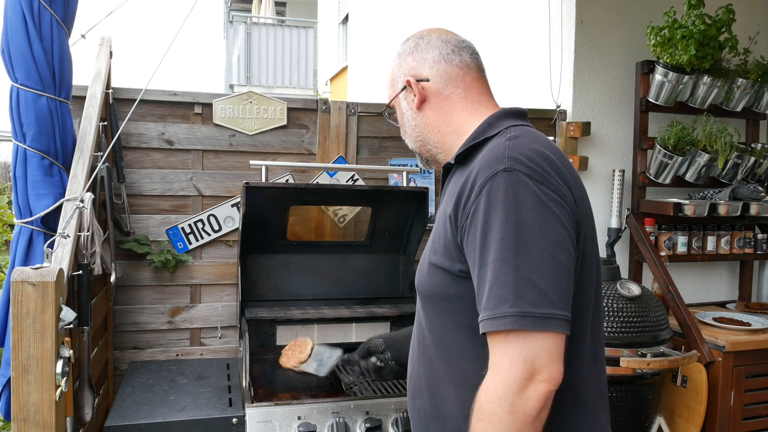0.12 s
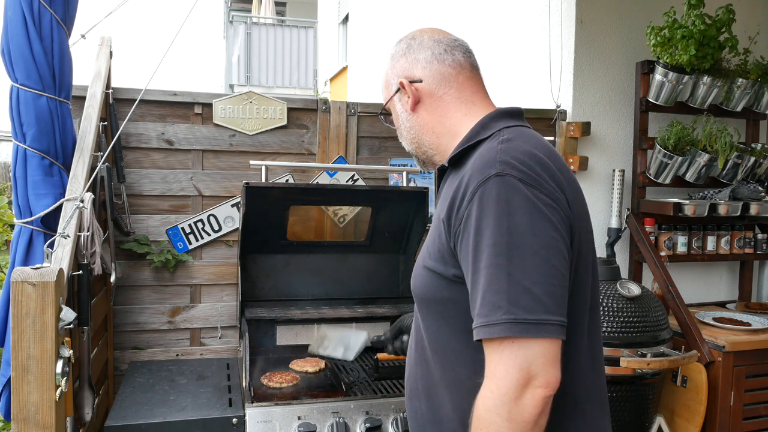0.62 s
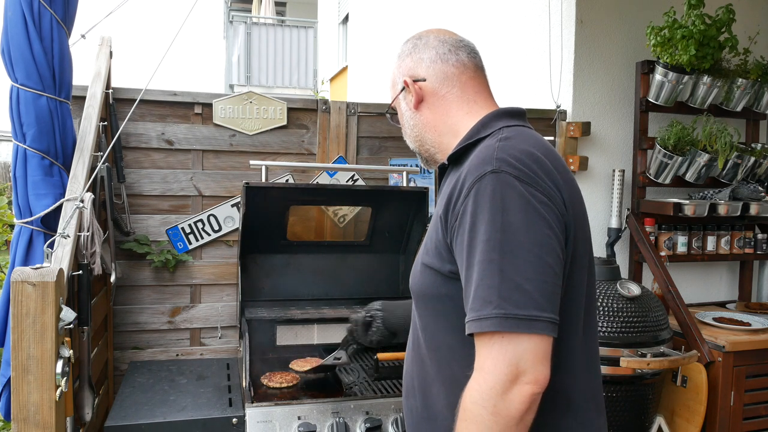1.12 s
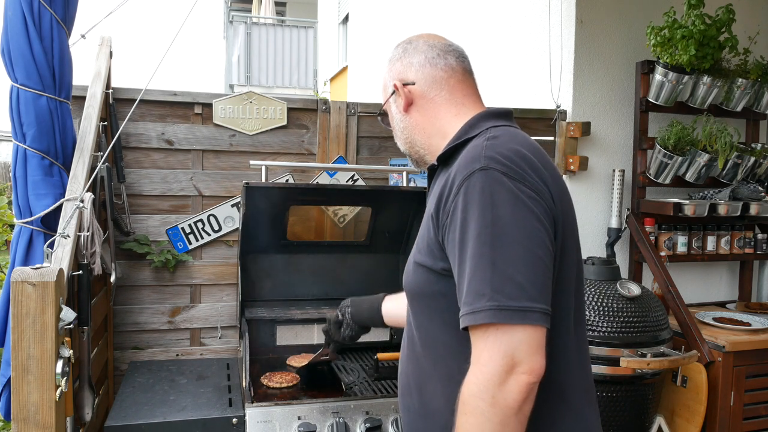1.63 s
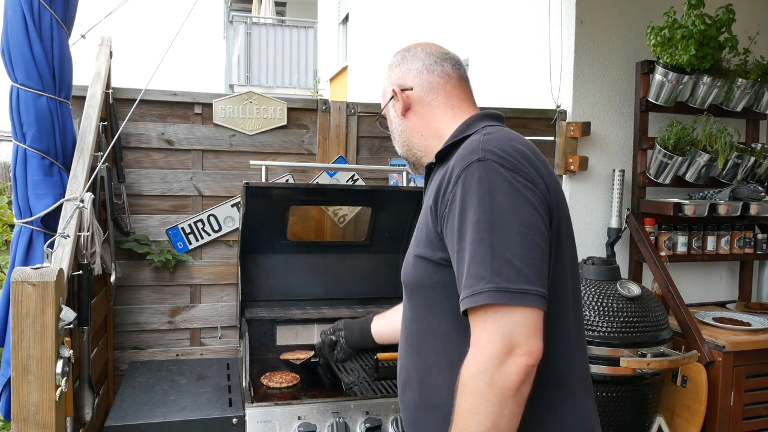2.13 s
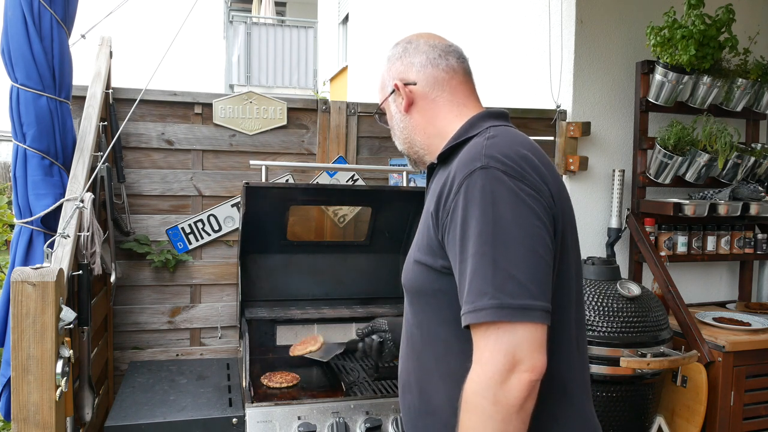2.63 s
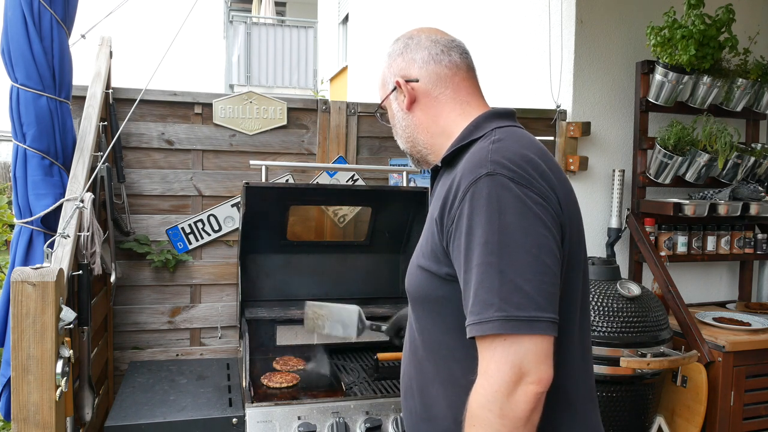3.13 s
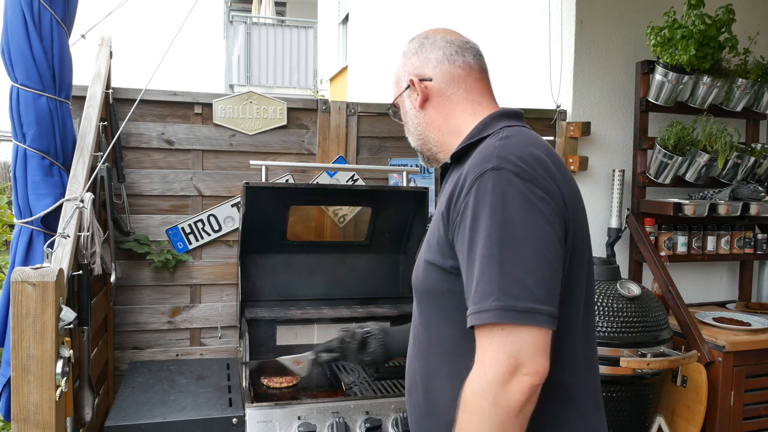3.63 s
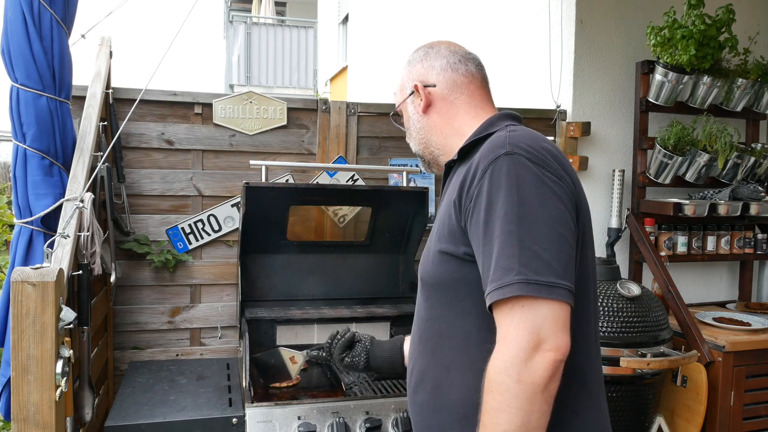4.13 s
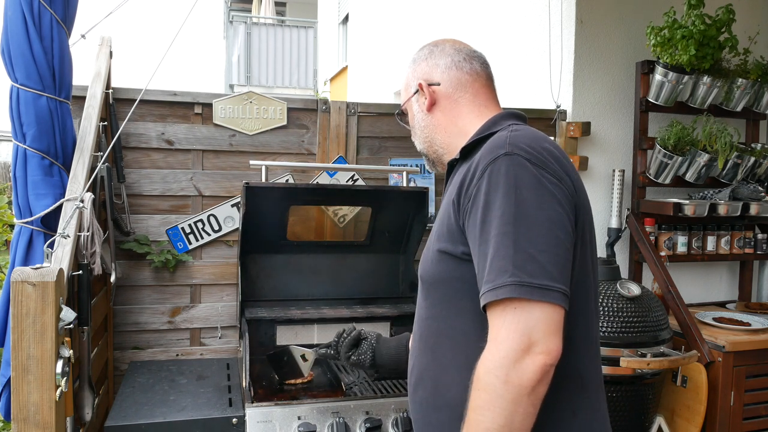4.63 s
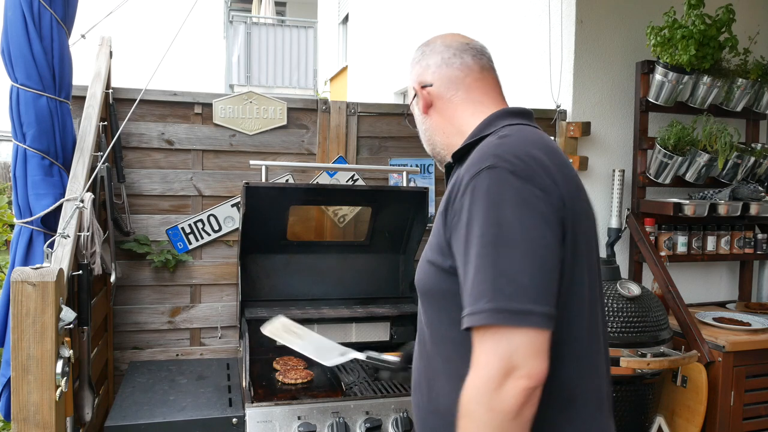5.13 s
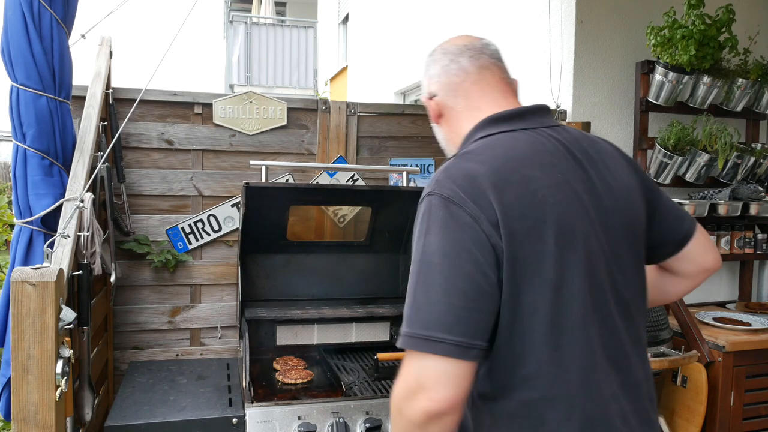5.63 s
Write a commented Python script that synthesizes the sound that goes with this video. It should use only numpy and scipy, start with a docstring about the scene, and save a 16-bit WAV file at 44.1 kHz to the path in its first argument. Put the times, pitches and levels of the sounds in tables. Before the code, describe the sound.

A soft sizzle opens, then flares sharply as a burger patty lands on hot steel. Frying continues bright and crackly with popping fat. A spatula knocks and scrapes the plate just after one second, squeaking faintly; a second patty hisses near three seconds, and harder clanks and scrapes follow around four. Outdoors, near-mono microphone, with low wind buffeting and a faint distant wash.

```python
"""A soft sizzle over low wind comes first, then surges as a burger patty lands on a steel griddle outdoors.
Frying is random bubble clicks mixed with hiss, coloured and echoed by the grill hood; spits of fat are short pops.
Sliding steel squeals as noise through narrow resonances. A spatula knocks and scrapes, ringing plate and blade.
Gusts rumble on the microphone as low filtered noise, above a steady wash from far traffic and burners."""
import sys
import numpy as np
from scipy import signal
from scipy.io import wavfile
from scipy.ndimage import uniform_filter1d

SR = 44100
rng = np.random.default_rng(int(sys.argv[2]) if len(sys.argv) > 2 else 0)


def master_out(mix):
    """Clip the mix to full scale and print it as 16-bit PCM to the path in sys.argv[1]."""
    frames = np.transpose(np.atleast_2d(mix))
    ceiling = np.clip(frames, -1, 1)
    pcm = np.round(ceiling * 32767).astype(np.int16)
    wavfile.write(sys.argv[1], SR, pcm)


def amplitude_ratio(level_db):
    """Convert a level in decibels to the matching linear amplitude (field) ratio."""
    exponent = np.asarray(level_db, float) / 20
    return 10 ** exponent


N = 253575  # length of the scene in samples

# ringing tones of the griddle plate: (pitch_hz, relative_db, relative time to fall 60 dB)
PLATE_MODES = [(284.7, 4, 0.31), (303, -3.5, 0.5), (358, 0, 0.21), (408, -6, 0.13), (521, 3, 1),
               (555, -1, 0.47), (661, 8.5, 0.37), (799, 17, 0.2), (782, -5.5, 0.38), (830, -8, .22),
               (870, -34, 0.22), (969, 1, 0.19)]
# ringing tones of the spatula blade: (pitch_hz, relative_db, relative time to fall 60 dB)
BLADE_MODES = [(1040.5, -11, 0.44), (1172, -5, 0.2), (1192, -1, 0.5), (1235, -7, 0.37), (1657, -11, 0.41),
               (1960, -9.5, 0.29), (1930, -17, 0.21), (2247, -4, 0.086), (2340, -7.5, 0.15),
               (2490, -6, 0.057), (2780, -4, 0.084), (2900, -4.5, 0.077), (3250, -11, 0.072),
               (3280, 1, 0.074), (3720, -1.5, 0.044), (4250, -11, 0.069), (4470, -2.5, 0.16),
               (4900, -4.5, 0.1), (5900, -4, 0.092), (7660, -3.5, 0.062)]


def evened(x):
    """Scales to rms 1."""
    return x / np.sqrt(np.mean(x ** 2) + 1e-20)


def read(points, hz):
    """Reads a spectrum on a log-frequency axis."""
    f, value = np.transpose(points)
    return np.interp(np.log(hz + 1), np.log(f + 1), value)


def add(mix, s, sound):
    """Mixes a sound in at s seconds."""
    part = mix[round(s * SR):][:len(sound)]
    part += sound[:len(part)]


def shaped(x, field_db, size=512):
    """Multiplies the short-time spectrum by a dB field of (Hz, s)."""
    overlap = size * 3 // 4
    hz, t, z = signal.stft(x, SR, nperseg=size, noverlap=overlap)
    z = z * amplitude_ratio(field_db(hz[:, None], t))
    return signal.istft(z, SR, nperseg=size, noverlap=overlap)[1][:N]


def causal(db):
    """Minimum-phase impulse response of a half spectrum in dB."""
    log_gain = np.log(amplitude_ratio(np.concatenate([db, db[-2:0:-1]])))
    return np.fft.ifft(np.exp(np.conj(signal.hilbert(log_gain)))).real[:len(db)]


def clicks(count, per_s, spread_db):
    """Random clicks of either sign, most small and a few large."""
    chance, size, sign = rng.random((3, count))
    heights = amplitude_ratio(spread_db * np.minimum(-np.log(size + 1e-9), 5))
    return (chance < per_s / SR) * heights * np.sign(sign - .5)


def patches(bins, frames, count, rows=257):
    """A random field over (Hz, frame), smooth across bins and frames, rms 1."""
    field = rng.standard_normal((count, rows)).T
    across_hz = uniform_filter1d(field, round(bins), 0)
    return evened(uniform_filter1d(across_hz, round(frames), 1))


def heat(t):
    """Level dB and brightness dB per octave of the frying: the simmer plus a steam flash at each landing."""
    # steady frying of the meat on the plate: (time_s, level_db, brightness in dB per octave)
    simmer_points = [(0.0, -39.5, -2), (0.15, -40, -0.5), (0.31, -36, -0.5), (0.45, -30, 0.5),
                     (0.75, -29.5, -0.2), (1.0, -27, 1.1), (1.4, -30, 0), (1.7, -31.5, 1.5),
                     (1.95, -29.5, -1.2), (2.4, -32.5, -.5), (2.9, -32.5, -0.6), (3.3, -28, 0.86),
                     (3.6, -30, -0.5), (3.9, -30, -0.5), (4.05, -30.5, -1), (4.3, -29.5, -0.5),
                     (4.7, -32, -1), (4.85, -31, 0), (5.55, -30.5, -0.4), (5.68, -29, 0), (5.75, -31, .5)]
    # a raw side meets the steel and flashes to steam: (start_s, rise_s, hold_s, peak_db, fall in dB per s)
    landings = [(0.316, 0.047, 0.063, -22, 51), (2.914, 0.011, .05, -22.5, 35)]
    flash_db_per_octave = 0.5  # the flash of steam is brighter than the simmer
    s, level_db, tilt_db = np.transpose(simmer_points)
    simmer_power = amplitude_ratio(2 * np.interp(t, s, level_db))
    flash_power = 0
    for at, rise, hold, db, fall_db in landings:
        fallen_db = fall_db * np.maximum(t - at - rise - hold, 0)
        flash_power = flash_power + np.clip((t - at) / rise, 0, 1) ** 3 * amplitude_ratio(2 * (db - fallen_db))
    power = simmer_power + flash_power
    brightness = np.interp(t, s, tilt_db) + flash_power / power * flash_db_per_octave
    return 10 * np.log10(power), brightness


def hood_db(hz):
    """The hood strengthens some pitches and weakens others, in dB."""
    # resonances and notches of the hood: (pitch_hz, width_hz, gain_db)
    resonances = [(1090, 610, 5.5), (3320, 1020, 7.5), (4450, 470, 5.5), (7800, 2600, -5),
                  (11700, 4950, 8.5), (3760, 210, -4), (1615, 1050, -4)]
    return sum(db / (1 + (2 * (hz - f) / width) ** 2) for f, width, db in resonances)


def sizzle():
    """Bursting fat bubbles are a crowd of clicks; steam is hiss, and takes over in fierce frying."""
    # colour of the frying before the hood: (pitch_hz, relative_db per Hz)
    sizzle_colour = [(120, -31), (200, -11), (450, -9), (700, -6.5), (1100, -4), (2000, -0.5), (3300, -4),
                     (5000, -1.5), (8000, 8), (10500, -3.5), (13000, -4.5), (15400, -1), (17000, -75)]
    # fiercer frying lifts one band: (pitch_hz, width in octaves, lift in dB per dB of level)
    fizz_hz, octaves, lift = (6100, 0.32, 0.15)
    level_db = heat(np.arange(N) / SR)[0]
    bubble_share = np.clip(0.29 * amplitude_ratio(-.6 * (level_db + 33.5)), 0, 1)  # of the power
    sputter = evened(uniform_filter1d(rng.standard_normal(N), 500))  # bubbles come in clumps
    bubbles = evened(clicks(N, per_s=900, spread_db=2.5) * amplitude_ratio(2.0 * sputter))
    bursts = patches(40, 2, count=N // 128 + 9)  # the tone of the bubbles keeps changing
    bubbles = shaped(bubbles, lambda f, at: 1.5 * bursts[:, :len(at)])
    seethe = uniform_filter1d(rng.standard_normal(N), 3000)  # the boil swells and sinks
    seethe = evened(uniform_filter1d(seethe, 3000))
    hiss = rng.standard_normal(N) * amplitude_ratio(0.13 * sputter)
    drive = np.sqrt(bubble_share) * evened(bubbles) + np.sqrt(1 - bubble_share) * hiss

    def fizz_db(f, at):
        distance = np.log2((f + 1) / fizz_hz) / octaves
        return lift * (heat(at)[0] + 44.3) * np.exp(-distance ** 2)

    drive = shaped(drive, lambda f, at: heat(at)[1] * np.log2((f + 200) / 8000))
    drive = shaped(drive, fizz_db)
    hz = np.linspace(0, SR / 2, 2049)
    colour = causal(read(sizzle_colour, hz) + hood_db(hz))
    drive = drive * amplitude_ratio(level_db + 0.66 * seethe)
    return signal.oaconvolve(drive, colour / np.linalg.norm(colour))[:N]


def pop(hz, turns=1.0, ring_hz=3300, ring_s=0.00058):
    """A bursting bubble: about one cycle of pressure, a spray of droplets and a short ring of the wet steel."""
    t = np.arange(256) / SR
    grain = np.diff(np.sin(2 * np.pi * hz * t) * np.exp(-t * hz / turns), prepend=0)
    spray = rng.standard_normal(len(t)) * np.exp(-t / 0.00015) * 0.18
    spray[0] += 1
    grain = np.convolve(spray, grain)[:len(t)]
    steel = 0.3 * np.sin(2 * np.pi * ring_hz * t) * np.exp(-t / ring_s)
    return grain / abs(grain).max() + steel


def spits():
    """Spits of fat: random small pops follow the frying level, and loud ones have set times; the hood colours all."""
    # the loudest spits of fat, before the hood: (start_s, level_db, pitch_hz)
    loud_spits = [(0.1459, -22, 8400), (0.4726, -19, 8000.0), (1.106, -14, 9200.0), (1.151, -17, 4500.0),
                  (1.306, -20, 9700.0), (1.7084, -16, 5900.0), (1.805, -13, 11100), (2.0087, -20, 7400),
                  (2.0212, -6, 5530), (2.0245, -17, 5000), (2.3636, -16, 7200.0), (2.5393, -21, 7100.0),
                  (3.1482, -13, 7800.0), (3.344, -16, 7600), (3.8924, -19, 7050), (3.966, -15, 6000.0),
                  (4.2583, -13, 6000.0), (4.9508, -18.0, 8200.0), (5.01, -20, 6700.0),
                  (5.3475, -21, 8200.0), (5.4165, -14, 8100), (5.5323, -15.0, 8100.0),
                  (5.65, -13.5, 8600.0), (5.6644, -11, 7300.0), (5.737, -21, 7500.0)]
    level_db = heat(np.arange(N) / SR)[0]
    small = clicks(N, per_s=4.7, spread_db=1.0) * amplitude_ratio(level_db + 3.5)
    out = signal.oaconvolve(small, pop(8600))[:N]
    for at, db, pitch_hz in loud_spits:
        add(out, at, amplitude_ratio(db) * pop(pitch_hz))
    return signal.oaconvolve(out, causal(hood_db(np.linspace(0, SR / 2, 2049))))[:N]


def frying():
    """Sizzle and spits reach the ear directly, then again as faint early echoes from the hood."""
    # echoes of the hood: (delay_s, level_db)
    echoes = [(.0011, -30.5), (.0034, -16.5), (.0052, -25.5)]
    direct = sizzle() + spits()
    echoed = direct.copy()
    for lag, db in echoes:
        add(echoed, lag, amplitude_ratio(db) * direct)
    return echoed


def wind():
    """Lumpy low pressure swings on the microphone, in fluttering gusts."""
    # colour of the wind rumble: (pitch_hz, relative_db per Hz)
    wind_colour = [(8, -24), (18, -0.5), (36, 1.5), (62, -1), (100, -7.5), (150, -17), (300, -30),
                   (550, -101.5)]
    # gusts on the microphone, before flutter: (peak_s, rise_s, fall_s, peak_db)
    gust_list = [(0.19, 0.11, 0.045, -52), (0.42, 0.044, .04, -42), (0.7, 0.066, 0.24, -38),
                 (0.94, 0.048, 0.029, -49), (1.38, 0.3, 0.085, -32), (1.58, 0.067, 0.12, -36.5),
                 (1.81, 0.14, 0.18, -45), (2.16, 0.056, 0.18, -43.5), (2.37, .08, 0.15, -38.5),
                 (2.52, 0.13, .12, -36.5), (2.95, 0.06, 0.57, -45), (3.39, 0.058, .3, -47),
                 (4.03, .1, .12, -45), (4.23, 0.037, 0.052, -49), (4.5, .25, 0.14, -43.5),
                 (4.96, .1, .07, -54), (5.68, .1, .1, -57)]
    drop_db = 10.5  # a gust is this far down one rise before and one fall after its peak
    calm_db, flutter_db = -62, 2.0
    swing = shaped(rng.standard_normal(N), lambda f, at: read(wind_colour, f), size=4096)
    t = np.arange(N) / SR
    power = amplitude_ratio(2 * calm_db)
    for s, rise, fall, db in gust_list:
        power = power + amplitude_ratio(2 * (db - drop_db * np.maximum((s - t) / rise, (t - s) / fall)))
    flutter = uniform_filter1d(rng.standard_normal(N), 1500)
    flutter = evened(uniform_filter1d(flutter, 1500))
    return evened(swing) * np.sqrt(power) * amplitude_ratio(flutter_db * flutter)


def yard():
    """Far traffic and burners make a steady low wash of filtered noise."""
    # colour of the wash: (pitch_hz, relative_db per Hz)
    wash_colour = [(40, -23), (90, 6.5), (170, -4), (400, -6), (1100, -6.5), (2000, -7), (6000, -49)]
    wash = shaped(rng.standard_normal(N), lambda f, at: read(wash_colour, f), size=2048)
    return amplitude_ratio(-52) * evened(wash)


def squeals():
    """Sliding steel sings on one note: friction noise through one narrow resonance, swelling and fading."""
    # squeals of the steel: (start_s, length_s, pitch_hz, level_db)
    squeal_notes = [(0.349, 0.056, 2540, -34.5), (3.734, .09, 444, -35), (1.206, .11, 1192, -33),
                    (1.269, 0.057, 1840, -37.5), (1.273, .08, 3280, -39.5), (1.334, 0.077, 2570, -39.5),
                    (1.4, .1, 1192, -44.5), (1.57, 0.16, 1192, -47.5), (1.799, 0.094, 3270, -39),
                    (1.836, 0.13, 1680, -41), (1.853, 0.069, 520, -44), (1.9, 0.11, 3140, -41),
                    (1.841, 0.13, 2340, -43), (3.7, 0.15, 1170, -38.5), (3.853, 0.074, 866, -44),
                    (4.038, .13, 830, -40.5), (4.038, 0.04, 1230, -39), (4.44, .16, 815, -47)]
    out = np.zeros(N)
    rub = rng.standard_normal((len(squeal_notes), SR // 2))
    for (s, length, hz, db), noise in zip(squeal_notes, rub):
        width_hz = 24 + hz / 60  # grows with pitch
        note = signal.lfilter(*signal.iirpeak(hz, hz / width_hz, SR), noise)
        note = note[-round(length * SR):]  # the resonance has settled by then
        breaks = evened(uniform_filter1d(noise[::-1], 700))[:len(note)]
        note = note * amplitude_ratio(3.0 * breaks)  # the note breaks up
        add(out, s, amplitude_ratio(db) * evened(note) * signal.windows.tukey(len(note), .4))
    return out


def ring(modes, tilt_db=0., length=0.43, crowd_db=-5.5):
    """Impulse response of struck steel, energy 1: the strong modes in a crowd of weak ones."""
    hz, db, t60 = np.transpose(modes)
    place, scatter = rng.random((2, 6 * len(modes)))
    crowd = hz[0] * 1.2 * (1.2 * hz[-1] / hz[0]) ** place
    db = np.r_[db, np.interp(crowd, hz, db) + crowd_db - 8.0 * scatter]
    t60 = length * np.r_[t60, np.interp(crowd, hz, t60)]
    hz = np.r_[hz, crowd]
    t = np.arange(SR // 4)[:, None] / SR
    fading = amplitude_ratio(db + tilt_db * np.log2(hz / hz[0]) - 60 * t / t60)
    out = (fading * np.sin(2 * np.pi * hz * t)).sum(1)
    # steel radiates little below its first mode
    out = signal.sosfilt(signal.butter(4, 0.72 * hz[0], "high", fs=SR, output="sos"), out)
    return out / np.linalg.norm(out)


def knocks():
    """Each spatula knock is a first contact and a brief noisy chatter, ringing plate and blade."""
    # spatula knocks: (start_s, plate_db, blade_db, top_hz: higher for harder contact, chatter_s)
    knock_list = [(1.1223, -30, -27, 3500, 0.028), (1.264, -44, -41, 3580, 0.0081),
                  (2.926, -46.5, -43, 3760, 0.094), (3.6964, -38.5, -28.5, 3950, 0.027),
                  (3.726, -40, -36.5, 2520, 0.032), (3.9869, -33.5, -24.5, 8600, 0.021),
                  (4.007, -28, -28, 6940, 0.03), (4.865, -63, -45.5, 3620, 0.00068),
                  (5.223, -61, -48.5, 2200, 0.00073)]
    out = np.zeros(N)
    t = np.arange(SR // 8) / SR
    window = np.sqrt(SR / 30)  # levels are rms over a thirtieth of a second
    for s, plate_db, blade_db, top_hz, chatter in knock_list:
        length = np.clip(chatter / 0.031, .03, .8)  # light ticks hardly set the steel ringing
        contact = np.exp(-(t / max(chatter, 3e-4)) ** 2) + 1.8 * np.exp(-t / 0.0003)
        force = rng.standard_normal((2, len(t))) * contact
        # softer contact, less treble
        force = signal.sosfilt(signal.butter(8, top_hz, fs=SR, output="sos"), force)
        force = force / np.linalg.norm(force, axis=1, keepdims=True) * window
        # tilts in dB per octave: harder contact brightens the plate,
        # and the more the blade leads the plate in level, the more its tilt shifts
        plate_tilt = -2.5 + 16 * np.log2(top_hz / 3500)
        blade_tilt = 1 - 0.12 * (blade_db - plate_db)
        plate = ring(PLATE_MODES, plate_tilt, length, crowd_db=-11.5)
        blade = ring(BLADE_MODES, blade_tilt, length, crowd_db=-5.0)
        plate_sound = amplitude_ratio(plate_db) * signal.fftconvolve(force[0], plate)
        blade_sound = amplitude_ratio(blade_db) * signal.fftconvolve(force[1], blade)
        add(out, s, plate_sound + blade_sound)
    return out


def scrapes():
    """The blade skips along the steel as a stream of small clicks that ring plate and blade."""
    # strokes of the blade along the plate: (start_s, length_s, plate_db, blade_db, plate_fade_db)
    strokes = [(1.148, 0.2, -23.5, -38, 15), (1.3, 0.52, -33.5, -35.5, 19.5),
               (1.771, 0.24, -44.5, -40.5, 6), (3.74, 0.13, -34, -45, 14), (3.855, 0.16, -35, -42, 10),
               (4.04, 0.088, -31.5, -38.5, 13), (4.138, 0.5, -44, -41, -1)]
    blade_fade = 0.24  # share of the plate's fade
    out = np.zeros(N)
    for s, length, plate_db, blade_db, fade_db in strokes:
        skips = evened(clicks(SR, per_s=1300, spread_db=2.5))[:round(length * SR)]
        along = np.linspace(0, 1, len(skips))
        # the edge catches and lets go
        judder = evened(uniform_filter1d(rng.standard_normal(SR), 900))[:len(skips)]
        skips = skips * signal.windows.tukey(len(skips), .15) * amplitude_ratio(1.7 * judder)
        plate_push = skips * amplitude_ratio(plate_db - fade_db * along)
        blade_push = skips * amplitude_ratio(blade_db - blade_fade * fade_db * along)
        add(out, s, signal.fftconvolve(plate_push, ring(PLATE_MODES, 1.6, length=0.31)))
        add(out, s, signal.fftconvolve(blade_push, ring(BLADE_MODES, -0.55, length=0.23)))
    return out


def scene():
    """Nearly mono; a weak phase-shifted copy flickers between the two sides."""
    # side against middle, before the flicker: (pitch_hz, level_db)
    spread = [(30, -32), (150, -23.5), (550, -27), (1650, -27.5), (2800, -30), (5000, -37.5), (9000, -39),
              (15000, -37.5)]
    mid = frying() + knocks() + scrapes() + squeals() + wind() + yard()
    flicker = patches(200, 2, count=N // 512 + 9, rows=1025)
    late = signal.hilbert(mid).imag  # a quarter turn out of phase, so neither side is louder
    side = shaped(late, lambda f, at: read(spread, f) + 7.1 * flicker[:, :len(at)], size=2048)
    return np.array([mid + side, mid - side])


def top_cut(x):
    """Nothing passes above the cut-off."""
    return signal.sosfilt(signal.butter(12, 16660, fs=SR, output="sos"), x)


def record(dry):
    """The level dips briefly once, fading down and up again."""
    dip_s, half_width_s = 5.3737, .009
    distance = abs(np.arange(N) / SR - dip_s) / half_width_s
    fade = np.clip(distance, .15, 1) ** 1.14
    return top_cut(dry * fade)


dry = scene()
out = record(dry)
master_out(out)
```